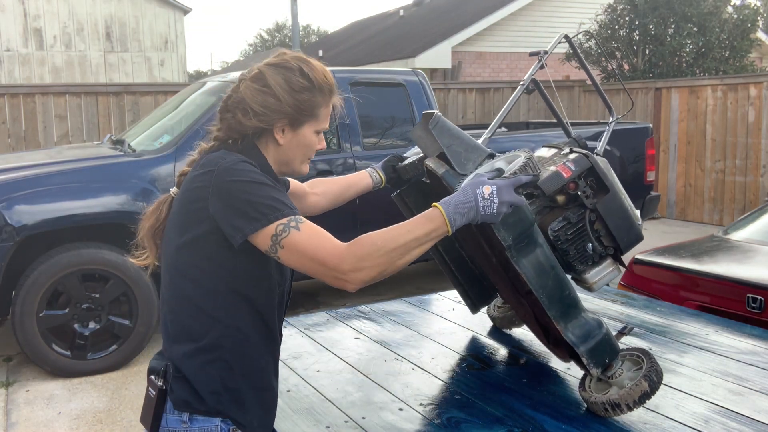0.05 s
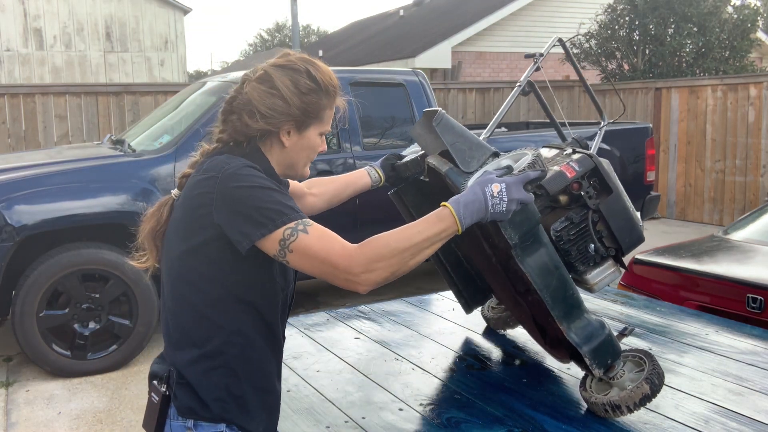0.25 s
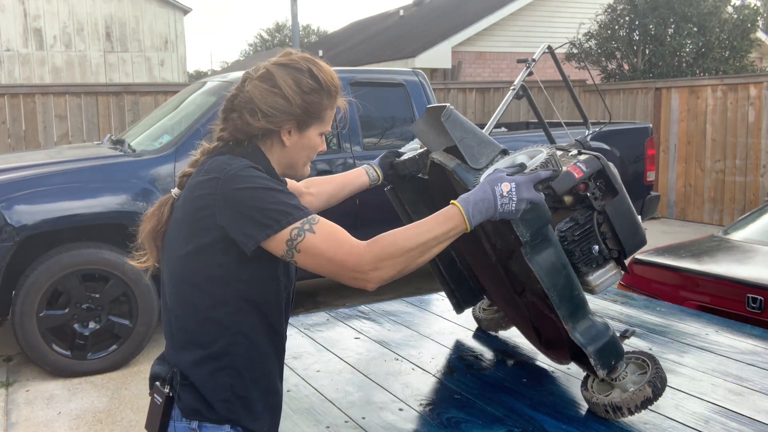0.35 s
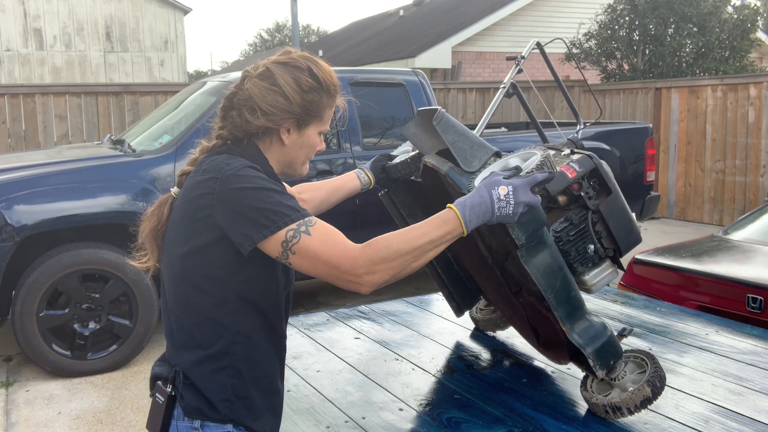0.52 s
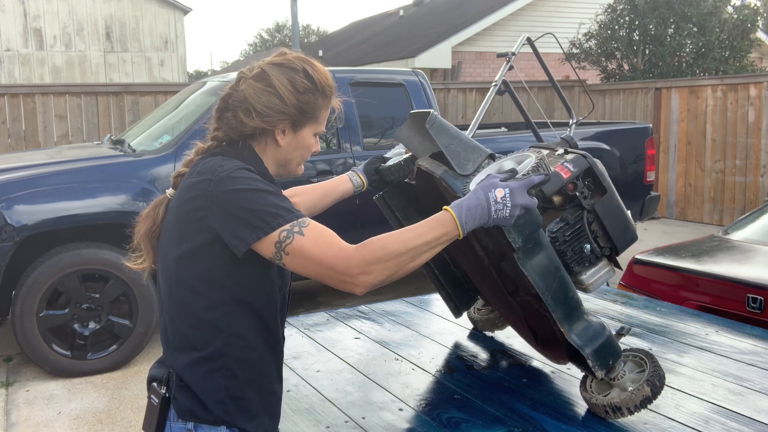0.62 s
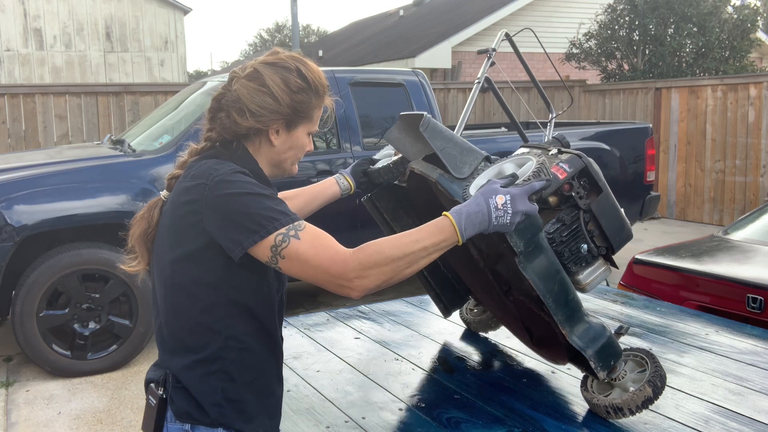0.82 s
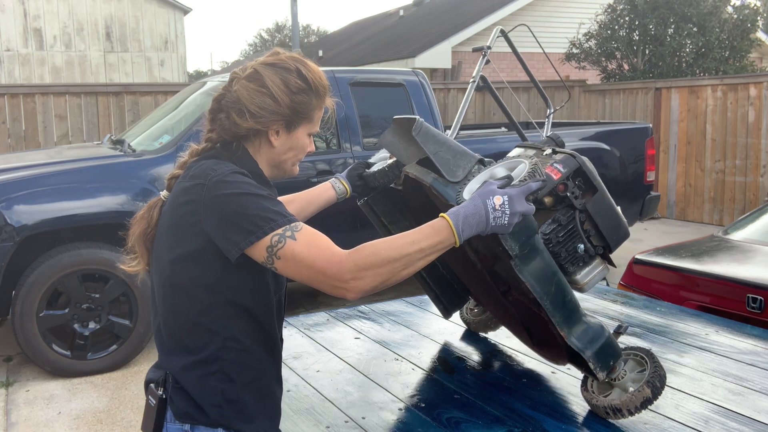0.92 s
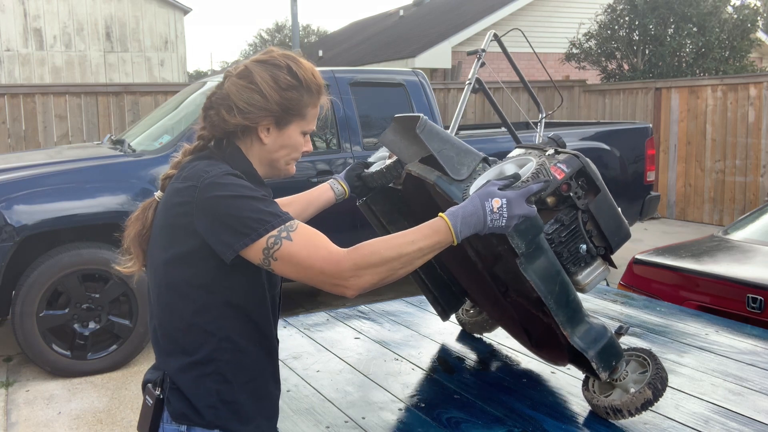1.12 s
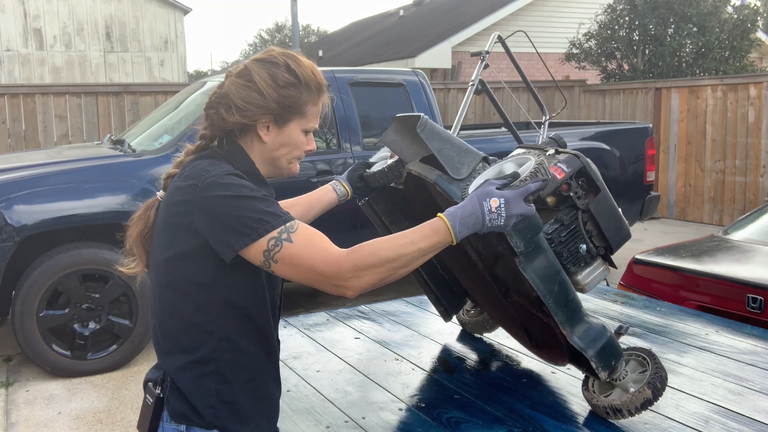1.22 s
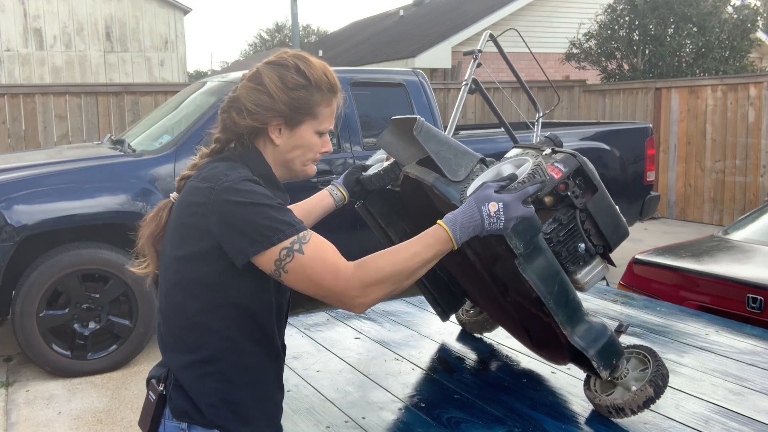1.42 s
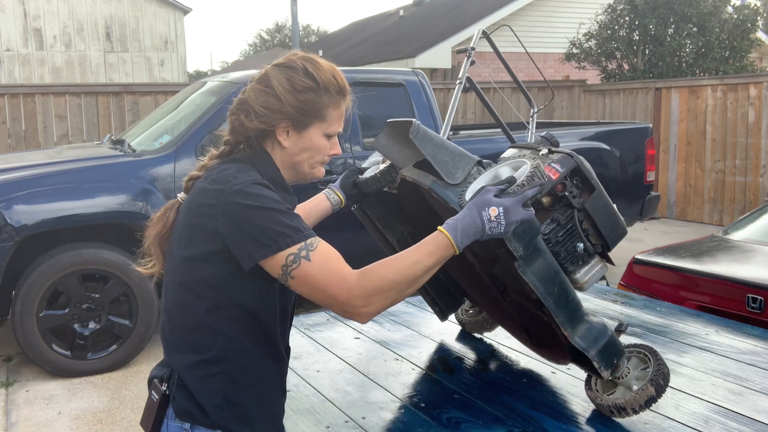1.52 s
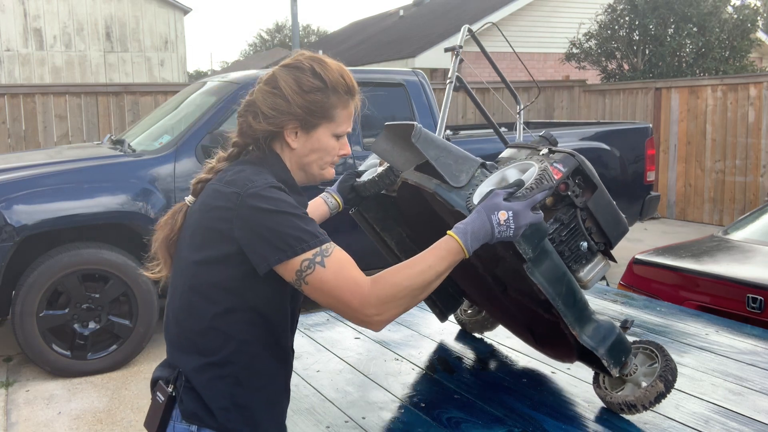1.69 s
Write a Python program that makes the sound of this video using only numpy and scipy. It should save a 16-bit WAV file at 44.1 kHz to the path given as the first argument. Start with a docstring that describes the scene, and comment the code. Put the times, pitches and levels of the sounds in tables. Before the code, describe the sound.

Outdoors, a lawnmower's metal deck drags over wooden boards in three short, ringing scrapes, the first with a squeal. A deep knock comes before the last scrape, then smaller knocks and faint ticks follow as the table rumbles.

```python
"""A light knock and small metal creaks: a steel lawnmower takes the load as it is tipped onto its side
on a wooden table outdoors. Its edge sticks and slips over the boards in three scrapes and one brief
catch that ring the deck; a wheel squeals in the first scrape and the deck sings thinly in the last.
The mower knocks down on the boards and settles with faint ticks while the table top rumbles.
Only the left channel carries sound."""
import sys
import numpy as np
from scipy import signal
from scipy.fft import rfft, irfft
from scipy.io import wavfile
from scipy.ndimage import uniform_filter1d, map_coordinates

SR = 44100
rng = np.random.default_rng(int(sys.argv[2]) if len(sys.argv) > 2 else 0)


def put_to_file(sound):
    """Save the sound as 16-bit audio at rate SR, in the file named by the first command-line argument."""
    columns = np.atleast_2d(sound).T  # one column per channel
    safe = np.clip(columns, -1, 1)
    whole_steps = np.round(safe * 32767)
    wavfile.write(sys.argv[1], SR, whole_steps.astype(np.int16))


N = 77175

# The steel deck's resonances. Each row: pitch in Hz, width in Hz, level in dB.
DECK_MODES = [(373, 73, -9), (519, 60, -10.5), (808, 135, -8.5), (1270, 255, -12), (1568, 122, -8.5),
              (2430, 140, -13.5), (3156, 150, -16.5), (3728, 240, -9), (4095, 98, -12), (5176, 610, -12),
              (5610, 320, -13), (6170, 470, -16), (8300, 730, -17.5), (10530, 830, -26.5)]
# The broad ring of sheet steel between them. Each row: frequency in Hz, level in dB.
SHEET_COLOUR = [(100, -26.5), (400, -19.5), (1000, -21), (2600, -16.5), (4500, -24.5), (9500, -29.5),
                (12500, -35.5), (16000, -53)]
# The side panel, which rings more as the mower comes down on it.
# Each row: pitch in Hz, width in Hz, level in dB.
PANEL_MODES = [(1734, 320, -8.5), (2006, 265, -4.5)]
# One force envelope per stroke of the edge. Each row in it: time in seconds, level in dB.
STROKE_FORCES = [
    [(0.185, -56), (0.25, -29), (0.31, -29.5), (0.415, -27.5), (0.454, -58)],
    [(0.5305, -62), (0.5325, -28.5), (0.542, -33), (0.575, -80)],
    [(0.642, -53), (0.649, -31.5), (0.675, -29.5), (0.74, -29), (0.776, -26), (0.786, -48)],
    [(0.84, -54.5), (0.873, -25.5), (0.91, -26.5), (0.96, -30.5), (1.03, -29), (1.054, -25.5), (1.096, -30),
     (1.122, -58)],
]
# Each stroke's character. Each row: slips per second, scatter of their gaps (natural log),
# treble lift in dB at TREBLE_HZ, side panel gain in dB.
STROKE_TONES = [(794.6, .15, 4, -5), (610.3, .3, -3, 4.5), (479, .35, 0.5, -0.5), (520, .4, -0.5, -1.5)]
TREBLE_HZ = 7460
FLEX_DEPTH_S, FLEX_PER_S = .00013, 28


def scraping():
    """The sliding edge shakes the deck: fast and even at first, then slower and rougher."""
    deck = np.hypot(resonances(DECK_MODES, order=2), colour(SHEET_COLOUR))
    panel = resonances(PANEL_MODES, order=2)
    out = np.zeros(N)
    for force, (rate_hz, scatter, treble_db, panel_db) in zip(STROKE_FORCES, STROKE_TONES):
        judder = level(force) * slips(force[0][0], force[-1][0], rate_hz, scatter)
        tilt = amp(treble_db * np.minimum(freqs() / TREBLE_HZ, 2))
        body = np.hypot(deck, amp(panel_db) * panel) * tilt
        out += ringing(convolve(judder, causal(body)), tail_db=-3)
    # The deck flexes as it slides, so its resonances wander.
    flexed_time = times() + FLEX_DEPTH_S * wobble(FLEX_PER_S)
    return map_coordinates(out, [flexed_time * SR], order=5)


def slips(start, end, rate_hz, scatter, spread_db=2):
    """Stick and slip: uneven little jerks, rms 1 from start to end."""
    gaps, sizes = rng.standard_normal((400, 2)).T
    onsets = start + np.cumsum(np.exp(scatter * gaps)) / rate_hz
    jerks = [(s, db) for s, db in zip(onsets, spread_db * sizes) if s < end]
    return norm(contacts(jerks, t60=0.006)) * np.sqrt(abs(end - start) * SR)


# How long the steel rings on. Each row: frequency in Hz, seconds to fall by 60 dB.
RING_TIMES = [(300, 0.2), (1500, 0.13), (3500, 0.086), (8000, 0.039), (15000, 0.0052)]


def ringing(x, tail_db):
    """Blend in the dense after-ring of the mower's panels; the highs die first."""
    hz, t, spectrum = signal.stft(rng.standard_normal(SR // 2), SR, nperseg=256)
    fade = decay(t, along(RING_TIMES, hz)[:, None])
    tail = signal.istft(spectrum * fade, SR, nperseg=256)[1]
    return (x + amp(tail_db) * convolve(x, norm(tail))) / np.hypot(1, amp(tail_db))


# The wheel's squeal. Each row: time in seconds, pitch in Hz, levels of harmonics 1, 2 and 3 in dB.
SQUEAL_PATH = [(0.21, 746.4, -52, -54, -48), (0.253, 789.4, -33, -32.5, -39.5),
               (0.311, 775, -35, -33.5, -44), (0.343, 780, -29.5, -31.5, -34),
               (0.379, 806, -30.5, -30.5, -33), (0.415, 788, -39.5, -29.5, -34),
               (0.435, 798, -46, -38.5, -44), (0.485, 800, -54, -56, -63)]
SQUEAL_JITTER, SQUEAL_VIBRATO = .013, .013  # shares of the pitch
VIBRATO_HZ = 42.8
FLUTTER_DB = 1.5  # per harmonic number: the overtones are the hoarsest


def squealing():
    """The wheel's slips lock into a hoarse tone that the table's sway bends."""
    s, hz, *harmonics = np.transpose(SQUEAL_PATH)
    sway = np.sin(2 * np.pi * VIBRATO_HZ * times() + wobble(9.7))
    phase = glide(s, hz, bend=SQUEAL_JITTER * wobble(260) + SQUEAL_VIBRATO * sway)
    out = np.zeros(N)
    for k, db in enumerate(harmonics, 1):
        flutter = amp(k * FLUTTER_DB * wobble(169.9))
        out += level(np.c_[s, db]) * flutter * np.sqrt(2) * np.sin(k * phase)
    return out


# The metallic whine in the last scrape. Each row: time in seconds, pitch in Hz, level in dB.
SINGING_PATH = [(0.875, 1600, -39), (0.895, 1592, -28), (0.92, 1577, -26.5), (0.945, 1560, -37),
                (1.02, 1550, -46), (1.049, 1540, -38), (1.098, 1612, -36), (1.14, 1620, -58)]


def singing():
    """The sliding edge bows one mode of the deck into a thin, nearly pure ring."""
    s, hz, db = np.transpose(SINGING_PATH)
    phase = glide(s, hz, bend=.004 * wobble(260))
    return level(np.c_[s, db]) * np.sqrt(2) * np.sin(phase)


# The mower's hits on the boards. Each row: start in seconds, strength of the low thump,
# of the wood and of the contact crack in dB, pitch of the struck spot in Hz.
HITS = [(0.0258, -45, -20.5, -27.5, 400), (0.211, -21, -12, -46, 390), (0.255, -21, -7.5, -17, 426),
        (0.617, -13, -14, -45, 370), (0.692, -18, -5, -33, 505), (0.768, 8.5, -2.5, -9, 215),
        (0.776, 0.5, -4.5, -9.5, 550), (0.783, -16, -3, -27, 730), (0.811, -3, -12, -8.5, 694),
        (0.8219, -1.5, -3.5, -30, 1006), (1.056, -6.5, -9.5, -23, 764), (1.1899, -34, -13, -18.5, 770),
        (1.2559, -32, -17.5, -19, 644), (1.339, -10, -2.5, -12.5, 918), (1.429, -11, -8.5, -29, 852)]
# The boards' woody resonances. Each row: pitch in Hz, width in Hz, level in dB.
BOARD_MODES = [(347, 22, -3), (526, 55, 1), (619, 52, -2), (713, 37, -1.5), (1590, 20, -2.5),
               (1840, 120, -14.5)]
# The tone of the deep thump and of the hard crack. Each row: frequency in Hz, level in dB.
THUMP_EQ = [(5, -37), (20, -5), (45, 4), (80, -8), (115, -0.5), (138, -10.5), (172, 5), (290, -11),
            (600, -22.5), (2000, -73)]
CRACK_EQ = [(300, -26), (1000, -3.5), (2500, -6), (3200, -12), (5000, -23.5), (9000, -28), (16000, -73)]
WOOD_LAG_S = 0.001963  # the boards answer just after the contact
SPOT_DB, SPOT_T60_S = -5, .025  # the struck spot's clack; its level follows the wood's strength


def knocking():
    """Each blow pushes the table, rings the boards and the struck spot, and cracks at the contact."""
    s, thump_db, wood_db, crack_db, spot_hz = np.transpose(HITS)
    thump = -convolve(impulses(s, thump_db), causal(colour(THUMP_EQ)))
    late = s + WOOD_LAG_S
    blows = 0.64 * (impulses(late, wood_db) + contacts(zip(late, wood_db), t60=0.036))
    boards = resonances(BOARD_MODES) / (1 + (freqs() / 2200) ** 2)  # dull above 2200 Hz
    wood = convolve(blows, causal(boards))
    t = np.arange(SR // 8) / SR
    for at, db, hz in zip(late, wood_db, spot_hz):
        clack = norm(np.sin(2 * np.pi * hz * t) * decay(t, SPOT_T60_S))
        wood[round(at * SR):][:len(t)] += amp(db + SPOT_DB) * clack
    crack = convolve(contacts(zip(s, crack_db), t60=0.019), causal(colour(CRACK_EQ)))
    return thump + ringing(wood + crack, tail_db=-9)


# The deck's creaks and snaps under load. Each row: start in seconds, relative level in dB.
CREAK_CUES = [(0.034, -46.5), (0.0544, -39.5), (0.0824, -38), (0.1056, -37), (0.124, -38.5), (0.143, -40),
              (0.154, -39.5), (0.175, -37.5), (0.1986, -38), (0.429, -30), (0.4331, -31), (0.8094, -34),
              (1.424, -45.5), (1.559, -50), (1.566, -56)]
# Their bright tone, shared by the ticks. Each row: frequency in Hz, level in dB.
CREAK_EQ = [(200, -13), (1000, -10), (2000, 0.5), (2800, -5), (4000, -1.5), (5400, -4), (7200, -11.5),
            (8600, -9), (12000, -18.5), (16000, -25)]
CREAK_GAIN_DB, CREAK_T60_S = 19, 0.0075  # for creaks and ticks alike
SETTLE_FROM_S, TICKS_PER_S = 1.12, 48
TICK_DB, TICK_SPREAD_DB, TICK_FADE_DB_PER_S = -60, 5.5, 23


def creaking():
    """The loaded deck gives in single bright slips; loose parts tick as the mower settles."""
    gaps, sizes = rng.standard_normal((26, 2)).T
    elapsed = np.cumsum(np.exp(0.55 * gaps)) / TICKS_PER_S
    tick_s = SETTLE_FROM_S + np.minimum(elapsed, 1)
    tick_db = TICK_DB + TICK_SPREAD_DB * sizes - TICK_FADE_DB_PER_S * elapsed
    snaps = impulses(*np.transpose(CREAK_CUES))
    grit = 0.47 * contacts(CREAK_CUES, CREAK_T60_S)
    ticks = contacts(zip(tick_s, tick_db), CREAK_T60_S)
    steel = convolve(snaps + grit + ticks, causal(colour(CREAK_EQ)))
    return amp(CREAK_GAIN_DB) * ringing(steel, tail_db=-0.5)


# The load rolling over the table. Each row: time in seconds, relative levels of sway and grind in dB.
ROLLING_LOAD = [(0, -57, -58.5), (0.189, -64, -50.5), (0.212, -30, -39), (0.3, -35.5, -43),
                (0.5, -37.5, -48.5), (0.595, -47, -50.5), (0.62, -36, -45.5), (0.74, -44.5, -38),
                (0.785, -27, -35), (0.88, -30, -38), (1.0, -39.5, -42), (1.061, -27.5, -36),
                (1.169, -31, -41), (1.25, -39, -51.5), (1.599, -47, -53.5), (1.75, -53, -51)]
# The tone of the deep sway and of the gritty grind. Each row: frequency in Hz, level in dB.
SWAY_EQ = [(10, -9), (28, -11), (39, -2), (46, 1.5), (54, -5), (70, -21.5), (110, -14.5), (150, -29),
           (1000, -79)]
GRIND_EQ = [(40, -26), (110, 0), (250, -0.5), (380, 0), (750, -6.5), (1100, -12.5), (2000, -16),
            (4000, -26.5), (8000, -38.5), (16000, -90)]
RUMBLE_GAIN_DB, GRIND_FLICKER_DB = 3.5, 3.13


def table_rumble():
    """The top sways at its low resonance while the wheels grind on the grain."""
    s, sway_db, grind_db = np.transpose(ROLLING_LOAD)
    sway = noise(SWAY_EQ)
    swells = np.sqrt(np.abs(uniform_filter1d(sway ** 2, size=1400)))
    sway = unit(sway / swells)  # evened out, so the load shapes its level
    grind = unit(noise(GRIND_EQ) * amp(GRIND_FLICKER_DB * wobble(120)))
    return amp(RUMBLE_GAIN_DB) * (level(np.c_[s, sway_db]) * sway + level(np.c_[s, grind_db]) * grind)


# The outdoor bed. Each row: frequency in Hz, relative level in dB.
AIR_EQ = [(30, 8.5), (100, -11), (500, -16), (1100, -31.5), (3900, -35), (5000, -40), (15500, -50)]


def outdoor_air(db=-42):
    """A steady low rumble with a trace of hiss."""
    return amp(db) * noise(AIR_EQ)


def amp(db):
    return 10 ** (np.asarray(db) / 20)


def unit(x):
    """Scale to rms 1."""
    return x / np.sqrt(np.mean(x ** 2) + 1e-20)


def norm(x):
    """Scale to energy 1."""
    return x / np.sqrt(np.sum(x ** 2) + 1e-20)


def along(points, hz):
    """Interpolate (Hz, value) points on a log axis."""
    f, values = np.transpose(points)
    return np.interp(np.log(hz + 1), np.log(f + 1), values)


def times():
    return np.arange(N) / SR


def freqs():
    return np.fft.rfftfreq(2 * N, 1 / SR)


def level(rows):
    """Gain per sample from (s, dB) rows, silent outside them."""
    s, db = np.transpose(rows)
    return amp(np.interp(times(), s, db)) * (times() >= s[0]) * (times() <= s[-1])


def decay(t, t60):
    """A fade of 60 dB every t60 seconds."""
    return np.exp(-np.log(1000) * t / t60)


def wobble(rate):
    """A smooth random curve, rate knots a second."""
    return map_coordinates(rng.standard_normal(int(N * rate / SR) + 4), [times() * rate])


def glide(s, hz, bend):
    """Phase of a sliding tone, bent by a share of its pitch."""
    return 2 * np.pi * np.cumsum(np.interp(times(), s, hz) * (1 + bend)) / SR


def filtered(x, response):
    return irfft(rfft(x, 2 * N) * response)[:N]


def convolve(x, h):
    return signal.fftconvolve(x, h)[:N]


def causal(gain):
    """Minimum-phase impulse response of energy 1, shaped by the given magnitude."""
    cepstrum = irfft(np.log(np.maximum(gain, 1e-6)))
    cepstrum[1:N] *= 2
    cepstrum[N + 1:] = 0
    return norm(irfft(np.exp(rfft(cepstrum)))[:N // 2])


def colour(points):
    return amp(along(points, freqs()))


def resonances(modes, order=1):
    """Magnitude of a set of (Hz, width, dB) resonances; a higher order gives steeper flanks."""
    f = freqs()
    power = 0
    for hz, width, db in modes:
        peak = (f * width) ** 2 / ((hz * hz - f * f) ** 2 + (f * width) ** 2)
        power += amp(db) ** 2 * peak ** order
    return np.sqrt(power)


def noise(points):
    return unit(filtered(rng.standard_normal(N), colour(points)))


def impulses(s, db):
    """One sharp push at each time."""
    return np.bincount(np.round(s * SR).astype(int), amp(db), N)


def contacts(rows, t60):
    """A fresh, dying puff of noise for each (s, dB) row."""
    t = np.arange(SR // 16) / SR
    out = np.zeros(N + SR)
    for s, db in rows:
        puff = norm(rng.standard_normal(len(t)) * decay(t, t60))
        out[max(round(s * SR), 0):][:len(t)] += amp(db) * puff
    return out[:N]


def scene():
    """Mower, table and air on the left; silence on the right."""
    mower = scraping() + squealing() + singing() + creaking() + knocking()
    return np.array([mower + table_rumble() + outdoor_air(), np.zeros(N)])


TOP_HZ = 15850


def record(dry):
    """A hard high cut removes everything above TOP_HZ."""
    return np.array([filtered(channel, freqs() < TOP_HZ) for channel in dry])


dry = scene()
out = record(dry)
put_to_file(out)
```